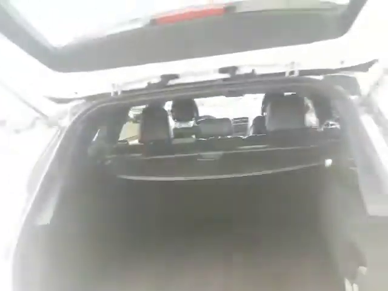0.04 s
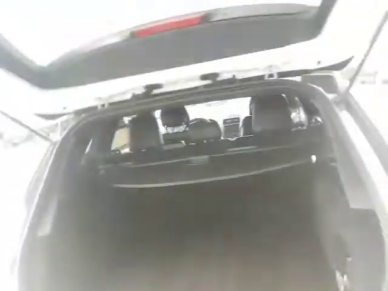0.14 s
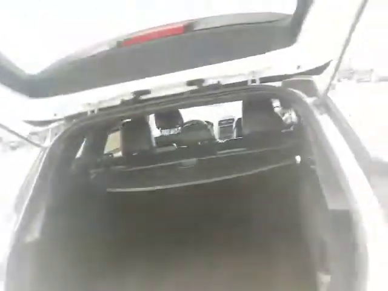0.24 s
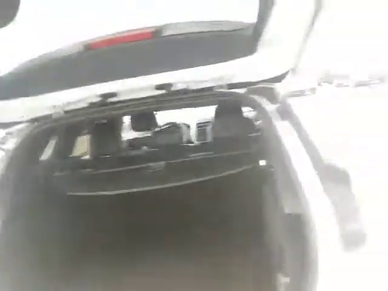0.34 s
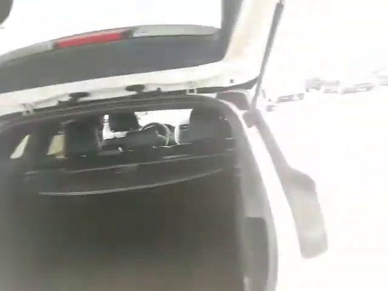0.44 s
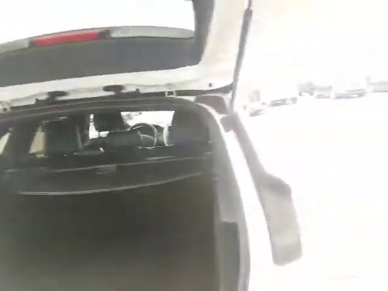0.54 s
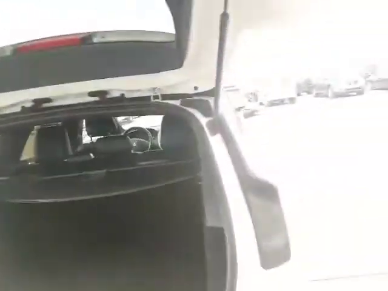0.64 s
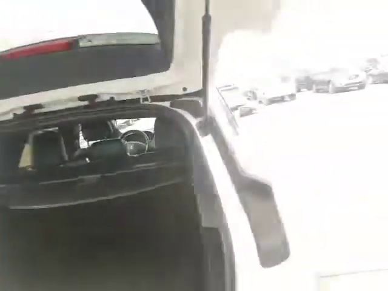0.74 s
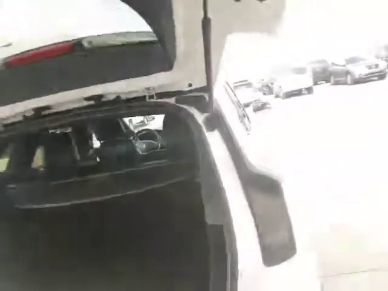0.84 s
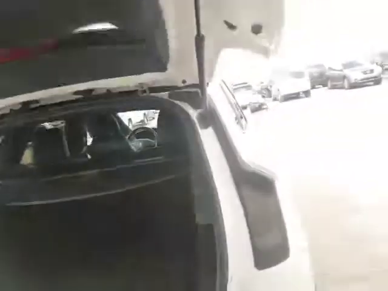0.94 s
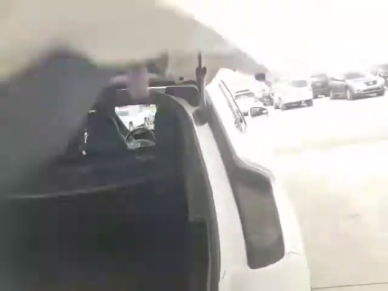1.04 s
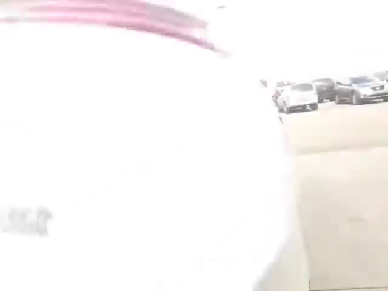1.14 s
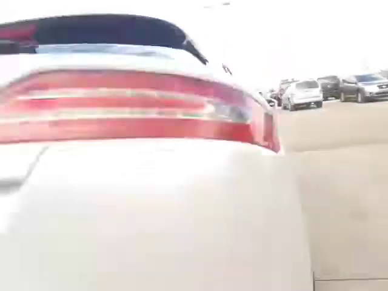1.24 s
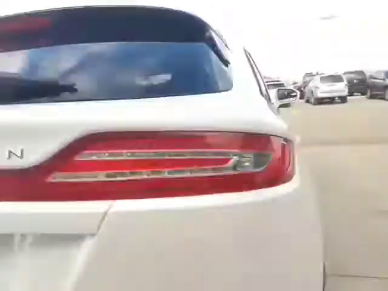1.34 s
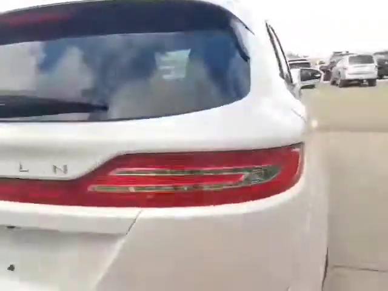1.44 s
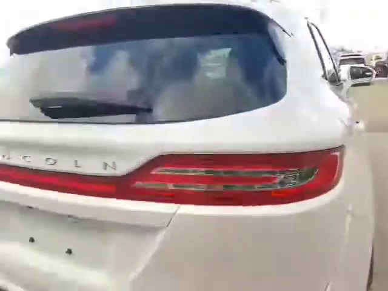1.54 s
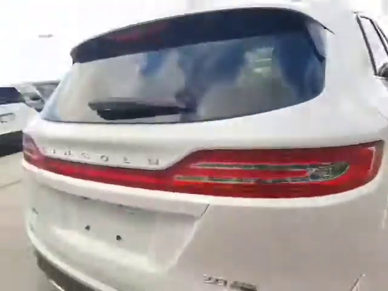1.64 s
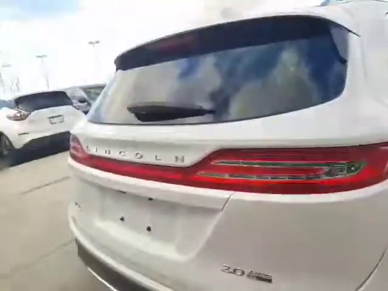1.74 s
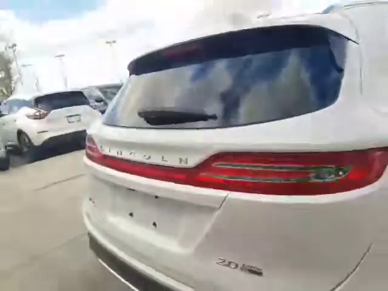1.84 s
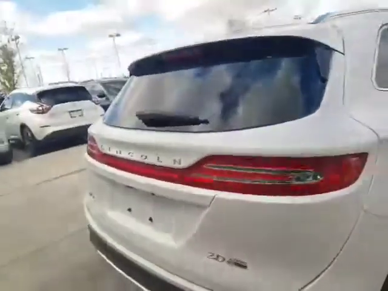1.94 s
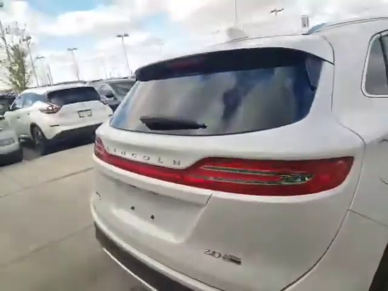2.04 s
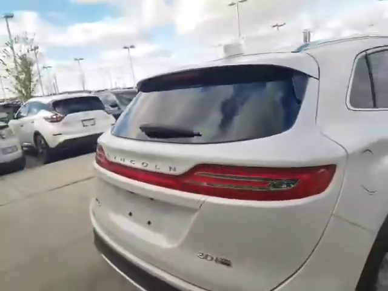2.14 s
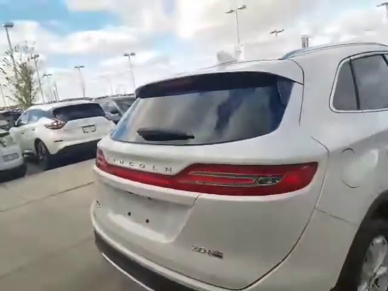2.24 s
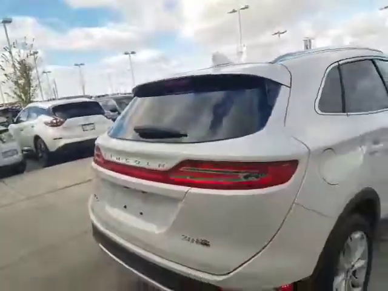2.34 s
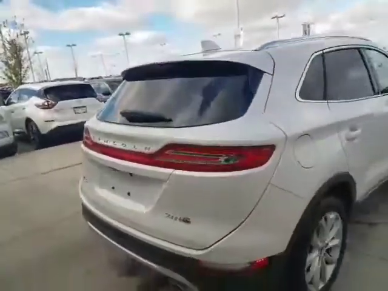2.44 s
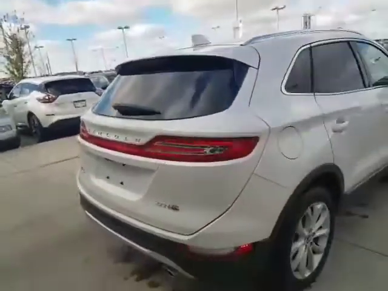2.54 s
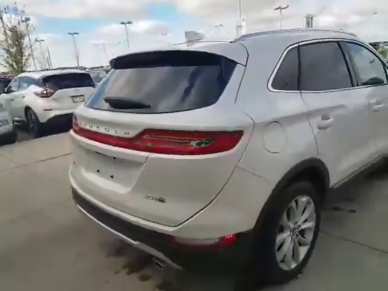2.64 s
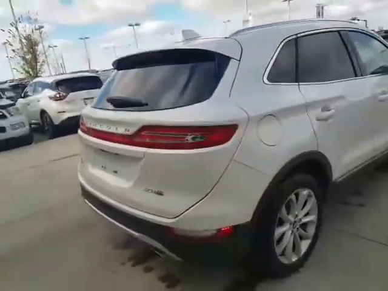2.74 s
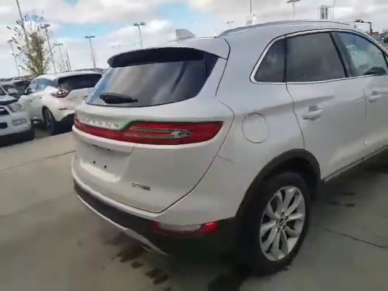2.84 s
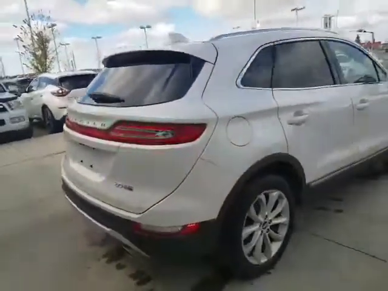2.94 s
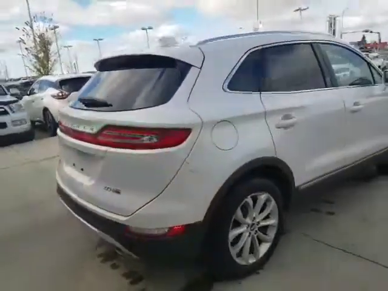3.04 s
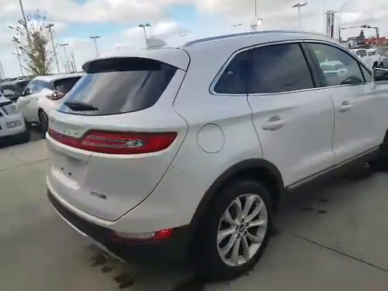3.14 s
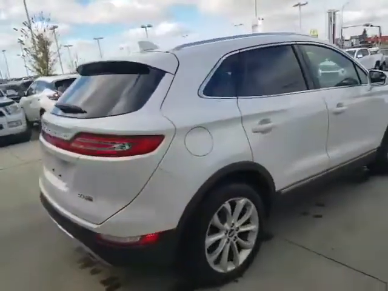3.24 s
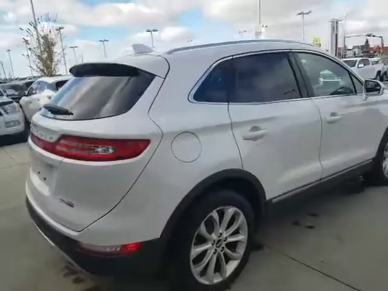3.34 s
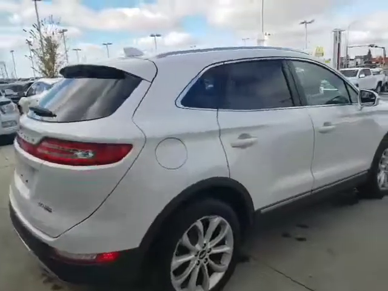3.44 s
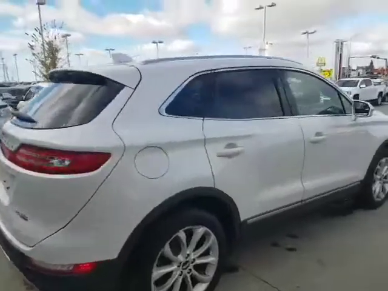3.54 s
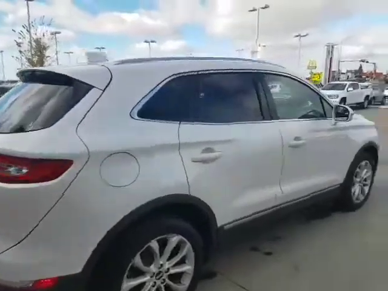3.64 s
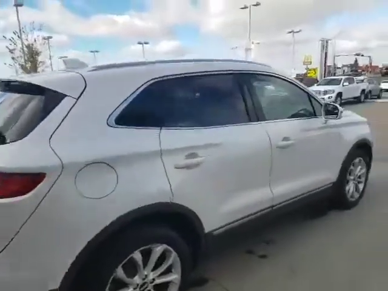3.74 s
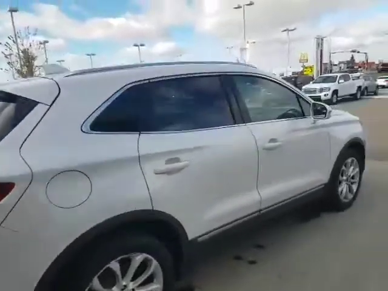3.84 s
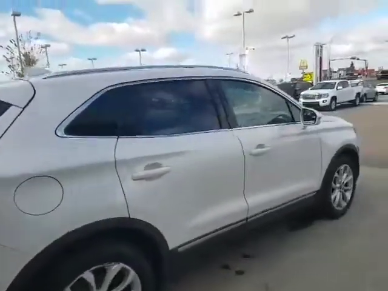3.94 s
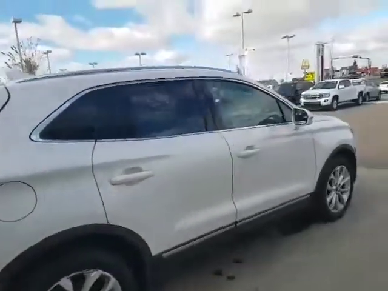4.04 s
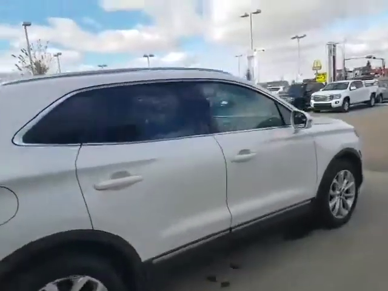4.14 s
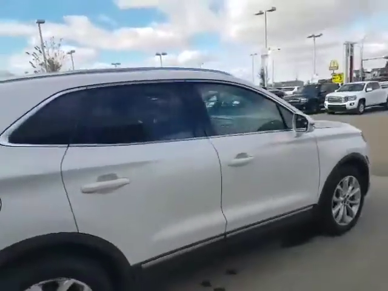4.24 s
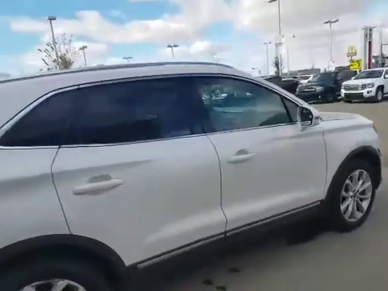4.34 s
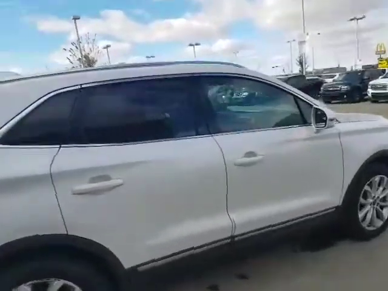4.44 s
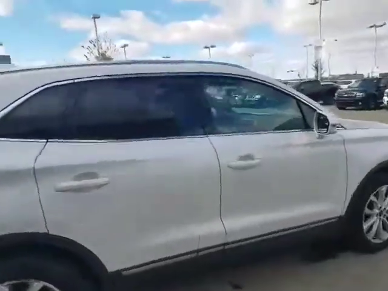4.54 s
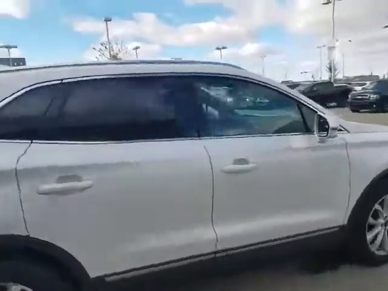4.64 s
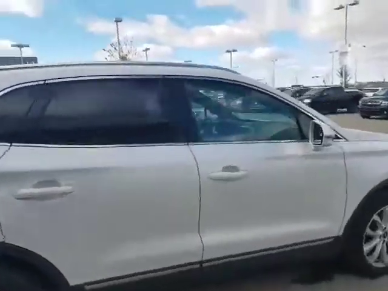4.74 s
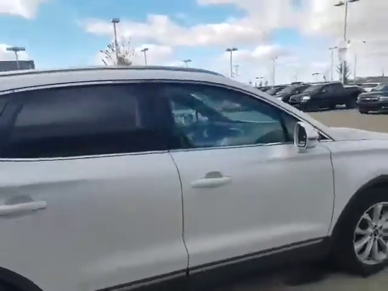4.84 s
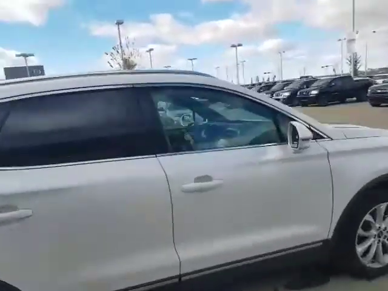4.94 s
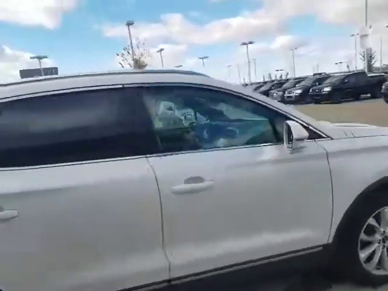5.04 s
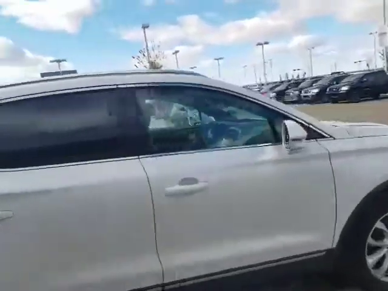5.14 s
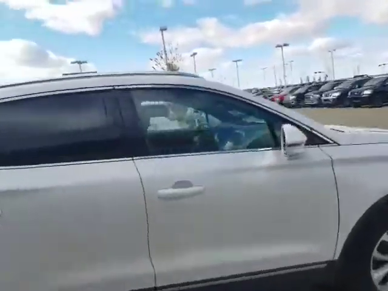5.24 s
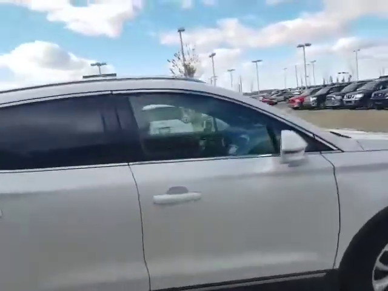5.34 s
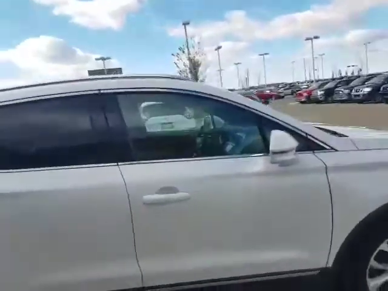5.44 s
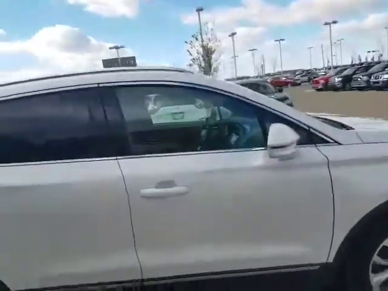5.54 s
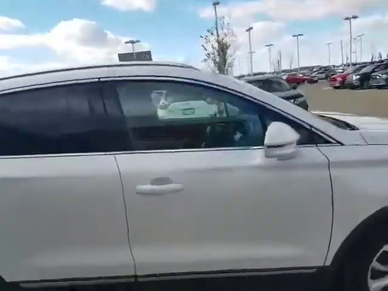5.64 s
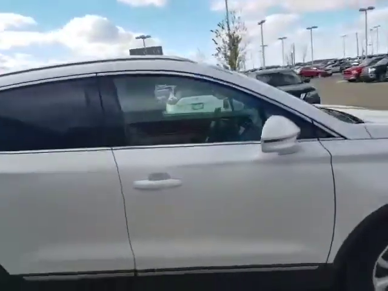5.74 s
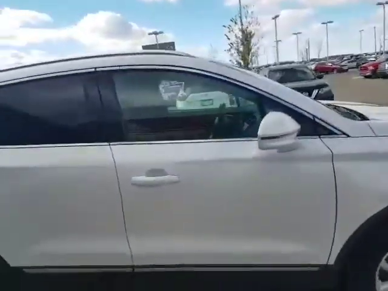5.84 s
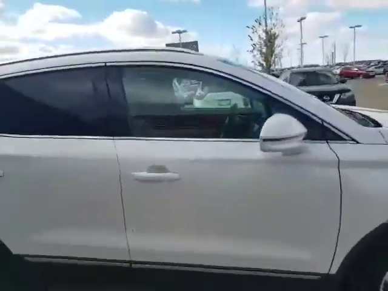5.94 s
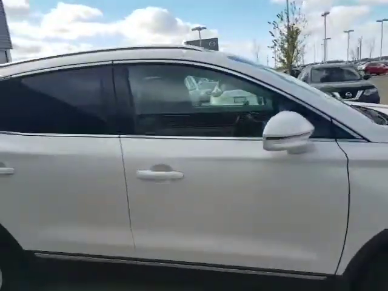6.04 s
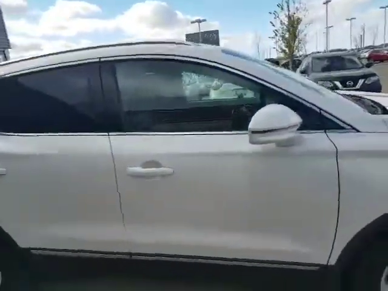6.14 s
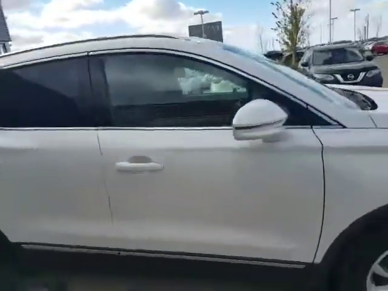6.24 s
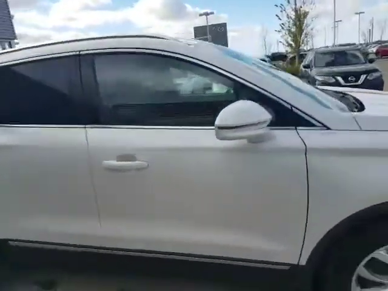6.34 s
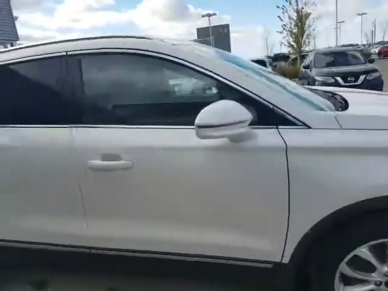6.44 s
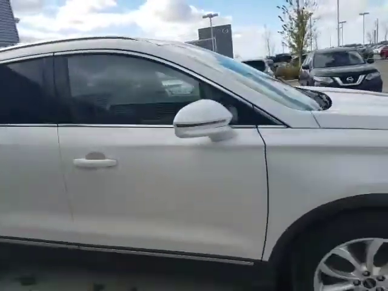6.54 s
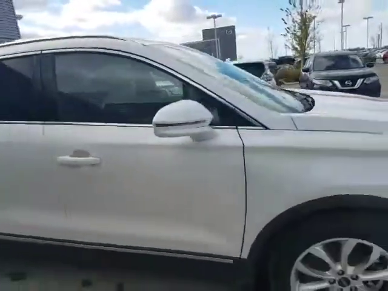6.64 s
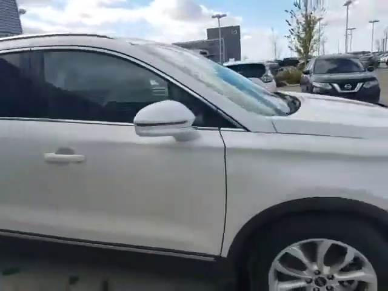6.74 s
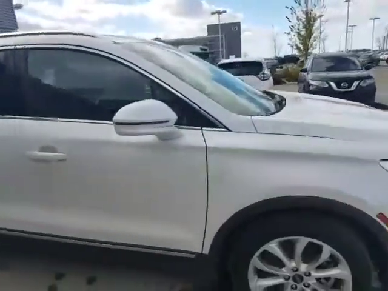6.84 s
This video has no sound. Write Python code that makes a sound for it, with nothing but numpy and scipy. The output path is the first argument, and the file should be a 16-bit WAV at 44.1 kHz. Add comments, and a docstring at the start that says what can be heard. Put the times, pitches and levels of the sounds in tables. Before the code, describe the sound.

On an open car lot, gas struts hiss softly and a shoe scuffs as a liftgate is pulled down. It shuts with one sharp, loud slam, a low thump and a brief rattle. A pebble crunches underfoot, then faint steps move over gritty concrete. Distant traffic hums throughout, and wind rumbles and pops on the handheld phone microphone, hardest at the end.

```python
"""A car's liftgate pulled shut by hand on an open lot, heard from beside the car on a stereo phone mic.
Gas hisses through the strut valves, then the gate slams on its latch and rubber stops: the panels ring,
the trim rattles out and the cabin air thumps. The recordist walks round the car on gritty concrete.
Far traffic hums behind it all, and wind buffets and pops in both mic ports, hardest at the end."""
import sys
import numpy as np
from scipy import signal
from scipy.fft import rfft, irfft, next_fast_len
from scipy.io import wavfile
from scipy.ndimage import uniform_filter1d, map_coordinates

SR = 44100
rng = np.random.default_rng(int(sys.argv[2]) if len(sys.argv) > 2 else 0)


def output_pcm(signal):
    """Save a mono or channel-first signal as 16-bit PCM at the path in sys.argv[1].

    Samples are clipped to [-1, 1] before scaling.
    """
    pcm = np.clip(np.atleast_2d(signal).T, -1, 1) * 32767
    wavfile.write(sys.argv[1], SR, np.round(pcm).astype(np.int16))


N = 303849

# How alike the gate sounds at the two ports: freq_hz, correlation
GATE_LIKENESS = [(60, 0.99), (130, 1), (290, 0.96), (640, 0.77), (1410, 0.12), (3100, 0.11), (6820, -0.0),
                 (15000, 0.23)]
DIFFUSE = [(50, 0)]  # left and right unrelated at every frequency


def amp(db):
    """Decibels to gain."""
    return 10 ** (np.asarray(db) / 20)


def unit(x):
    """x scaled to rms 1."""
    return x / np.sqrt(np.mean(x ** 2) + 1e-20)


def along(points, hz):
    """Reads (freq_hz, value) points on a log frequency axis."""
    freqs, values = np.transpose(points)
    return np.interp(np.log(hz + 1), np.log(freqs + 1), values)


def curves(rows):
    """A per-sample curve for each column after the time, -120 outside the rows."""
    times, *columns = np.transpose(rows)
    return [np.interp(np.arange(N) / SR, times, column, left=-120, right=-120) for column in columns]


def wobble(rate_hz):
    """A smooth random curve with rate_hz knots a second."""
    knots = rng.standard_normal(int(N * rate_hz / SR) + 4)
    return map_coordinates(knots, [np.arange(N) * rate_hz / SR])


def colour(spectrum):
    """The response of a (freq_hz, level_db) table."""
    return lambda hz: amp(along(spectrum, hz))


def band(centre_hz, width_hz):
    """The response of a steep resonance."""
    return lambda f: (f * width_hz / np.hypot(centre_hz ** 2 - f ** 2, f * width_hz + 1)) ** 2


def filtered(x, response):
    """x through a frequency response."""
    n = x.shape[-1]
    padded = next_fast_len(n + 4096)
    return irfft(rfft(x, padded) * response(np.fft.rfftfreq(padded, 1 / SR)), padded)[..., :n]


def noise(response, likeness, n=N):
    """Stereo noise of rms 1 with a given response and left-right correlation."""
    def mid_and_side(hz):
        angle = np.arccos(np.clip(along(likeness, hz), -1, 1)) / 2
        return response(hz) * [np.cos(angle), np.sin(angle)]
    mid, side = filtered(rng.standard_normal((2, n)), mid_and_side)
    return unit(np.array([mid + side, mid - side]))


def patchy(x, depth_db):
    """Makes x flicker in random patches of time and frequency, at rms 1."""
    spectra = signal.stft(x, nperseg=512)[2]
    patches = uniform_filter1d(rng.standard_normal(spectra.shape[1:]), size=6, axis=0)
    patches = unit(uniform_filter1d(patches, size=12, axis=1))
    return unit(signal.istft(spectra * amp(depth_db * patches), nperseg=512)[1][:, :x.shape[1]])


def pan(pan_db):
    """Left and right gains; pan_db is left minus right."""
    return amp([pan_db / 2, -pan_db / 2]).reshape(2, -1)


def add(out, start_s, x):
    """Mixes x into out from start_s on."""
    i = round(start_s * SR)
    out[:, i:i + x.shape[1]] += x[:, :N - i]


def far_traffic():
    """A distant road drifts in level; one vehicle's tyres swell past, and a faint hum fades early."""
    spectrum = [(59, -12.5), (100, -2.5), (145, -8.5), (170, -6), (280, -10.5), (335, -13.5), (379, -8),
                (453, -6.5), (732, -1.5), (1690, -8), (2730, -27.5), (7000, -66), (9100, -96),
                (15400, -120)]  # the road: freq_hz, level_db
    likeness = [(60, 0.55), (130, 0.87), (290, 1), (640, 0.16), (1410, -0.34), (3100, -0.033),
                (6820, -0.25), (15000, 0.0)]  # left against right: freq_hz, correlation
    road_level = [(0, -42.5), (.5, -42.5), (.65, -41.5), (1.4, -41.5), (1.9, -41), (2.08, -44.5),
                  (2.35, -40.5), (2.55, -42.5), (3.3, -42.5), (3.45, -41), (4.2, -42), (5.1, -42.5),
                  (5.78, -41), (6.2, -42.5), (6.89, -40.5)]  # the steady flow: time_s, level_db
    tyre_level = [(2.3, -71), (2.6, -50.5), (2.8, -42.5), (3.1, -51), (3.45, -43), (3.9, -47.5), (4.3, -54),
                  (4.6, -61.5)]  # the passing vehicle: time_s, level_db
    hum_level = [(0, -51.5), (.2, -57), (.32, -77)]  # the faint hum: time_s, level_db
    road_db = curves(road_level)[0] + 0.55 * wobble(3) + 0.49 * wobble(8)
    out = amp(road_db) * patchy(noise(colour(spectrum), likeness), depth_db=1.2)
    tyre_db = curves(tyre_level)[0] + 1.7 * wobble(6.15)
    out += amp(tyre_db) * noise(band(786, 350), likeness)
    add(out, 0, amp(curves(hum_level)[0][:SR]) * noise(band(245, 19), likeness, SR))
    return out * pan(-0.83)


def late_hiss():
    """A faint, broad hiss round 3.3 kHz that comes up near the end."""
    swell = [(5.4, -90), (5.54, -72), (5.89, -71), (6.1, -76), (6.5, -76), (6.65, -69), (6.89, -67)]  # the hiss: time_s, level_db
    out, n = np.zeros((2, N)), 2 * SR
    out[:, -n:] = amp(curves(swell)[0][-n:]) * noise(band(3300, 2600), DIFFUSE, n)
    return out


def wind_buffet():
    """Wind on the bare mic: a low, lumpy rumble, each port with its own swells."""
    gusts = [(0, -52, 1), (.38, -44, -5.5), (.6, -46, 0), (1.1, -52.5, -5), (1.3, -38.5, -6.5),
             (1.5, -45, 3), (1.8, -38, -7.5), (2.1, -40.5, 4.5), (2.4, -54.5, 8), (3.0, -42, -3.5),
             (3.5, -53.5, -2), (4.2, -51.5, -1), (4.5, -48, -6), (4.75, -44, -1), (5.0, -49, -5),
             (5.25, -44, 4), (5.8, -56, -3), (6.12, -46, -13.5), (6.42, -31.5, -5), (6.56, -35.5, -7),
             (6.75, -32, -9), (6.89, -40, -2)]  # wind at the ports: time_s, level_db, pan_db
    spectrum = [(12, -40), (20, -39), (47, 5.5), (110, 4), (262, -4), (343, -0.5), (700, -29), (910, -50),
                (1540, -120)]  # the rumble: freq_hz, level_db
    level_db, pan_db = curves(gusts)
    lumps_db = np.array([8 * np.tanh(.22 * wobble(14) + .5 * wobble(55)) for port in range(2)])
    swells_db = 1.9 * np.array([wobble(9), wobble(9)])
    rumble = noise(colour(spectrum), likeness=[(50, 0.11)])
    return amp(level_db) * pan(pan_db) * unit(amp(lumps_db + swells_db) * rumble)


def wind_pops():
    """Eddies burst on the ports, each a push and a swing back; the last gust adds a flurry of them."""
    # The strongest eddies: centre_s, level_db, pitch_hz, pan_db, width_cycles
    eddies = [(.2308, -29, 348, -16, 0.46), (.3133, -25.5, 620, -16, 0.58), (1.404, -33, 166, 5, 0.54),
              (1.9652, -22, 278, -14, .5), (2.2359, -24, 425, -2.5, 0.77), (2.547, -22.5, 470, 24, 0.3),
              (4.6822, -29.5, 394, -2, 0.69), (5.6337, -24.5, 703, -3, .42), (5.6386, -26, 750, -2, 0.37),
              (5.9258, -26.5, 700, -1, 0.45), (6.103, -25, 737, -18, 0.39), (6.1495, -22, 400, -19, 0.31),
              (6.1714, -19.5, 605, -25, .45), (6.1878, -19.5, 459, -22, .33), (6.205, -18, 590, -14, .36),
              (6.2391, -22, 572, -19, 0.35), (6.3405, -20, 1000, -16, 1.3), (6.3742, -20.5, 850, -23, 0.64),
              (6.3971, -20, 291, -18, .34), (6.4142, -15.5, 317, 1, 0.44), (6.4446, -20.5, 403, -16, .54),
              (6.5775, -23, 585, -21, 0.55), (6.6091, -22, 517, -21, .4), (6.64, -15, 281, -17, .4),
              (6.68, -13.5, 264, -17, .34), (6.6994, -18.5, 350, 23, 0.55), (6.7274, -14, 366, -16, 1.33),
              (6.741, -13, 340, -19, .36), (6.7771, -20.5, 347, 4, .8), (6.8468, -24, 332, -15, 0.66)]
    out, t = np.zeros((2, N)), np.arange(-600, 900) / SR
    times, scatter = rng.uniform(6.25, 6.85, size=24), rng.standard_normal((24, 3))
    flurry = [(s, -25 + 3 * size, 300 * np.exp(.25 * pitch), -15.5 + 6 * side, 0.42)
              for s, (size, pitch, side) in zip(times, scatter)]
    for centre_s, level_db, pitch_hz, pan_db, width in eddies + flurry:
        cycles = pitch_hz * t
        swing = np.cos(2 * np.pi * cycles + 1.2) * np.exp(-(cycles / width) ** 2)
        edge = 0.36 * np.cos(4.2 * np.pi * cycles) * np.exp(-(2.1 * cycles / width) ** 2)
        gains = amp(level_db - abs(pan_db) / 2) * pan(pan_db)  # panning only lowers the far port
        add(out, centre_s + t[0], gains * (swing + edge))
    return out


def rustle():
    """A thin, cloth-like hiss as the recordist steps back."""
    swell = [(1.7, -60), (1.874, -64.5), (2.184, -63.5), (2.394, -55), (2.524, -64), (2.62, -80)]  # the rustle: time_s, level_db
    spectrum = [(1760, -19), (3000, -2.5), (3280, -11), (4300, -8), (5150, -14.5), (8080, -14.5),
                (8780, -23), (9150, -17), (11400, -13.5), (12800, -20), (15700, -27)]  # its bands: freq_hz, level_db
    out, start_s = np.zeros((2, N)), swell[0][0]
    level_db = curves(swell)[0][round(start_s * SR):][:SR]
    add(out, start_s, amp(level_db) * patchy(noise(colour(spectrum), DIFFUSE, SR), depth_db=1.0))
    return out


def gritty_envelope(t, rise_s, hold_s, t60_s):
    """A rise, a hold and a decay, broken into clumps of grit a millisecond long."""
    clumps = amp(1.3 * uniform_filter1d(rng.standard_normal(len(t)), size=40) * np.sqrt(40))
    decay = amp(-60 * np.clip(t - rise_s - hold_s, 0, None) / t60_s)
    return unit(clumps) * np.clip(t / rise_s, 0, 1) * decay


def footsteps():
    """Soles roll over grit below the mic: spiky noise in a resonance that slides as the sole bends."""
    # Soles dragging: start_s, level_db, rise_s, hold_s, first_hz, last_hz, grit_db, pan_db
    scuffs = [(.633, -43, .01, .022, 690, 680, -33, 2), (.839, -31.5, 0.016, 0.043, 1230, 2100, -36, -1),
              (1.282, -59, .01, .018, 6000, 6000, -10, 0), (1.91, -66, .009, 0.017, 4500, 4500, -14, 12),
              (2.337, -36, 0.029, .012, 1700, 1800, -33, 0), (2.931, -68.5, .016, .12, 3480, 3460, -19, 5),
              (3.557, -53.5, 0.031, 0.036, 3000, 3000, -12, 5),
              (4.179, -67.5, .01, .024, 4000, 4000, -2, 3), (4.678, -65.5, .005, .05, 3300, 3500, -12, 5),
              (4.72, -59, .011, .032, 4460, 3800, -14, 2), (5.24, -65.5, .008, 0.051, 3600, 3600, -5, 1),
              (5.308, -68, .006, .05, 4000, 4000, -6, 0), (5.916, -69.5, .01, .048, 4000, 4000, 2, 0),
              (5.982, -67.5, .01, .03, 5000, 5000, 0, 0)]
    # Narrower, gliding rubs: start_s, level_db, hold_s, first_hz, last_hz, pan_db
    squeaks = [(1.42, -55.5, 0.048, 2580, 2900, 11), (2.391, -61.5, 0.14, 2900, 3370, 15),
               (3.624, -68.5, 0.062, 5240, 4560, 7)]
    ticks = [(.277, -51, 12600, 2), (2.3658, -35, 2200, 2), (2.371, -30.5, 2000, 4),
             (2.909, -46.5, 2200, 2), (2.952, -57, 2800, 13)]  # single grains snapping: start_s, level_db, pitch_hz, pan_db
    crunches = [(2.2407, -24.5, 0.0019, 0.034, 7.5), (2.247, -28, .007, 0.022, 4),
                (2.258, -25, .0005, .012, 2), (2.261, -36.5, 0.014, .035, 2)]  # a pebble crushed underfoot: start_s, level_db, hold_s, t60_s, pan_db
    pebble_spectrum = [(880, -27), (1500, -4), (1620, -28), (1740, -10.5), (3010, -12), (3260, -15),
                       (3530, -12.5), (6170, -7), (6680, -4), (8880, -6), (9890, -1), (10900, -10),
                       (14700, -12), (15700, -29)]  # its crunch: freq_hz, level_db
    out, t = np.zeros((2, N)), np.arange(SR // 4) / SR
    likeness = [(300, 1.0), (3000, 0.031)]  # freq_hz, correlation

    def rub(start_s, level_db, rise_s, hold_s, first_hz, last_hz, grit_db, pan_db, t60_s, breadth):
        def sole(hz):
            resonance = band(hz, breadth * last_hz)
            return noise(lambda f: resonance(f) + amp(grit_db) * (f > 1500), likeness, len(t))
        bend = np.clip(t / (rise_s + hold_s), 0, 1) * np.pi / 2
        scrape = np.cos(bend) * sole(first_hz) + np.sin(bend) * sole(last_hz)
        add(out, start_s, amp(level_db) * pan(pan_db) * gritty_envelope(t, rise_s, hold_s, t60_s) * scrape)

    for scuff in scuffs:
        rub(*scuff, t60_s=.1, breadth=.75)
    for start_s, level_db, hold_s, first_hz, last_hz, pan_db in squeaks:
        rub(start_s, level_db, rise_s=.01, hold_s=hold_s, first_hz=first_hz, last_hz=last_hz,
            grit_db=-23, pan_db=pan_db, t60_s=.14, breadth=.2)
    for start_s, level_db, pitch_hz, pan_db in ticks:
        rub(start_s, level_db, rise_s=.00064, hold_s=.00064, first_hz=pitch_hz, last_hz=pitch_hz,
            grit_db=-28, pan_db=pan_db, t60_s=.012, breadth=.45)
    for start_s, level_db, hold_s, t60_s, pan_db in crunches:
        envelope = amp(level_db) * gritty_envelope(t, rise_s=.0013, hold_s=hold_s, t60_s=t60_s)
        add(out, start_s, pan(pan_db) * envelope * noise(colour(pebble_spectrum), likeness, len(t)))
    return out


def gas_struts():
    """Gas forced through the valves whistles high and rushes broadly, lower late in the swing."""
    flow = [(0, -67, -67), (.27, -64, -62), (.52, -70, -68.5), (.58, -70, -58), (.642, -56, -46),
            (.824, -57.5, -46.5), (.866, -51, -42), (.986, -56.5, -51.5), (1.094, -47.5, -54.5),
            (1.26, -58, -58.5), (1.34, -57.5, -65), (1.452, -64, -56), (1.49, -60, -55)]  # gas through the valves: time_s, whistle_db, rush_db
    whistle_spectrum = [(5000, -34), (8500, -12), (9540, -11.5), (10600, -2.5), (11200, -0.5), (12000, -2),
                        (13200, -2.5), (15700, -14)]  # the whistle: freq_hz, level_db
    rush_spectra = ([(1200, -38), (2000, -8), (2600, -2), (3700, -2), (4300, -4.5), (4900, -10),
                    (7800, -11.5), (8800, -18), (10500, -18), (14000, -50)], [(1060, -40), (1800, -20),
                    (1850, -2), (2850, -4.5), (4910, -15), (8660, -22.5), (10000, -30), (13000, -46),
                    (22000, -120)])  # the early rush and the late one, each: freq_hz, level_db
    out, n = np.zeros((2, N)), 3 * SR // 2
    whistle_db, rush_db = (curve[:n] for curve in curves(flow))
    whistle = patchy(noise(colour(whistle_spectrum), DIFFUSE, n), depth_db=2.5)
    early, late = (patchy(noise(colour(rows), [(50, .1)], n), depth_db=.7) for rows in rush_spectra)
    crossfade = np.clip((np.arange(n) / SR - .75) / 0.15, 0, 1) * np.pi / 2
    rush = np.cos(crossfade) * early + np.sin(crossfade) * late
    add(out, 0, amp(whistle_db) * whistle + amp(rush_db) * rush)
    return out


def cabin_thump(start_s=1.5, level_db=-24, pitch_hz=54, t60_s=.4):
    """Cabin air squeezed by the closing gate: a low, dying swing, alike at both ports."""
    t = np.clip(np.arange(N) / SR - start_s, 0, None)
    return amp(level_db - 60 * t / t60_s) * np.sin(2 * np.pi * pitch_hz * t)


def trim_shudder(n):
    """Loose trim and glass shake: noise whose every frequency dies at its own speed."""
    spectrum = [(24, -43), (40, -9.5), (145, -9), (360, -2.5), (445, -6.5), (824, -6.5), (980, -4),
                (1080, -15), (1360, -11), (4000, -37.5), (5200, -68), (8800, -120)]  # the shaking: freq_hz, level_db
    decay_times = [(50, 0.46), (120, 0.3), (250, 0.38), (500, 0.24), (1200, 0.16), (4000, 0.33)]  # how long it lasts: freq_hz, t60_s
    hz, t, spectra = signal.stft(noise(colour(spectrum), GATE_LIKENESS, n), SR, nperseg=256)
    decay = amp(-60 * t / along(decay_times, hz)[:, None])
    return signal.istft(spectra * decay, SR, nperseg=256)[1][:, :n]


def liftgate_slam():
    """Every contact of the gate cracks the latch, rings the panels and shakes the trim."""
    # Contacts, each driving the modes near spot_hz best: start_s, crack_db, blow_db, spot_hz
    contacts = [(1.4943, -27, -18.5, 700), (1.4975, -26, -13.5, 1070), (1.503, -15, -4.5, 720),
                (1.512, -19, -7, 505), (1.516, -21, -5.5, 600), (1.5324, -17.5, -8, 980),
                (1.541, -41, -9.5, 270), (1.553, -23, -9, 390), (1.573, -31, -15.5, 302),
                (1.5872, -18.5, -18, 710), (1.6, -42, -23, 370), (1.6423, -32, -30, 400),
                (1.6938, -54, -33.5, 296), (1.721, -46, -47.5, 300), (1.8193, -53, -49.5, 200)]
    panel_modes = [(124, -1, 0.24), (187, 0, 0.13), (247, 0, 0.099), (310, -7, .12), (356, -15, 0.07),
                   (407, 6.5, 0.09), (501.4, 4, 0.12), (643, 0, 0.088), (702, -1.5, 0.14), (817, 3, 0.11),
                   (920, -10, 0.074), (1066, 2.5, 0.11), (1177, -1, .08), (1198, 0.5, 0.12),
                   (1520, -15, 0.055), (1680, -6, 0.057), (2000, 3, 0.044), (2100, -30, 0.035),
                   (2480, -17, 0.042)]  # gate and body shell: pitch_hz, level_db, t60_s
    latch_spectrum = [(880, -34), (1500, -5.5), (1990, -8), (2930, -22), (4330, -11.5), (4640, -10),
                      (5940, -17), (8050, -23), (14700, -22.5), (15700, -35)]  # the latch crack: freq_hz, level_db
    out, t = np.zeros((2, N)), np.arange(SR // 4) / SR
    hz, mode_db, t60_s = np.transpose(panel_modes)[:, :, None]
    lead = np.arccos(np.clip(along(GATE_LIKENESS, hz), -1, 1)) / 2  # phase lead at the left port
    lead[1::2] *= -1  # the modes radiate from alternate sides
    waves = np.array([np.sin(2 * np.pi * hz * t + side * lead) for side in (1, -1)])
    ring_envelope = (1 - np.exp(-t / .0027)) * amp(-60 * t / t60_s)
    crack_envelope = (1 - np.exp(-t / .0012)) * (amp(-60 * t / .035) + amp(-10 - 60 * t / .17))
    for start_s, crack_db, blow_db, spot_hz in contacts:
        drive = amp(mode_db - 9.9 * np.log2(hz / spot_hz) ** 2 + rng.normal(0, 3.4, hz.shape))
        ring = np.sum(drive * ring_envelope * waves, axis=1)
        crack = crack_envelope * noise(colour(latch_spectrum), GATE_LIKENESS, len(t))
        body = amp(-3.5) * ring + trim_shudder(len(t))
        add(out, start_s, amp(blow_db) * body + amp(crack_db) * crack)
    return out * pan(-0.6)


def gain_control(x, knee_db, slope, memory_s):
    """The phone turns down as the running power nears and passes the knee, then creeps back."""
    keep = np.exp(-1 / (memory_s * SR))
    power = signal.lfilter([1 - keep], [1, -keep], np.mean(x ** 2, axis=0))
    return x * (1 + power / amp(2 * knee_db)) ** (-slope / 2)


def scene():
    """The lot as it reaches the two ports."""
    return (far_traffic() + wind_buffet() + wind_pops() + gas_struts() + rustle()
            + liftgate_slam() + cabin_thump() + footsteps() + late_hiss())


def record(dry):
    """The handheld phone: self-noise, bass roll-off, gain control, a soft ceiling and a band limit."""
    self_noise = [(2940, 4), (5000, -0.5), (8800, -5), (9820, -5), (14800, -1), (15700, -5)]  # the mic's own hiss: freq_hz, level_db
    x = dry + amp(-68) * noise(colour(self_noise), DIFFUSE)
    x = signal.sosfilt(signal.butter(2, 42, "high", fs=SR, output="sos"), x)
    x = gain_control(x, knee_db=-33, slope=.3, memory_s=.17)
    x = x / (1 + np.abs(x / .97) ** 6) ** (1 / 6)
    return filtered(x, lambda hz: hz < 15800)


dry = scene()
out = record(dry)
output_pcm(out)
```